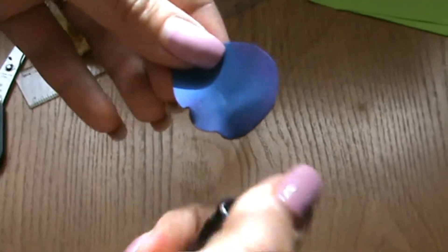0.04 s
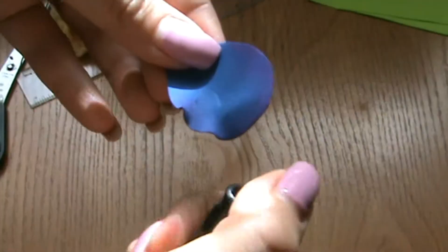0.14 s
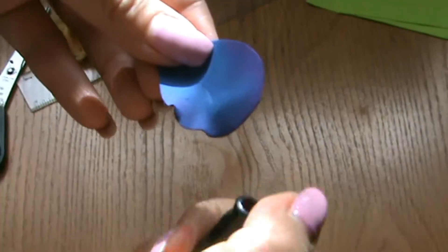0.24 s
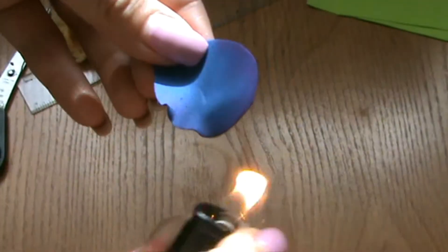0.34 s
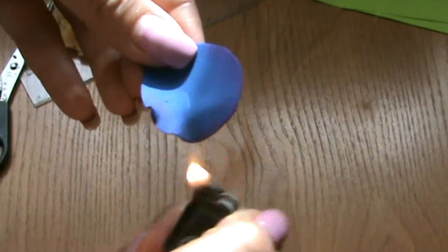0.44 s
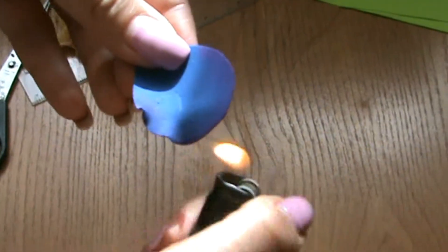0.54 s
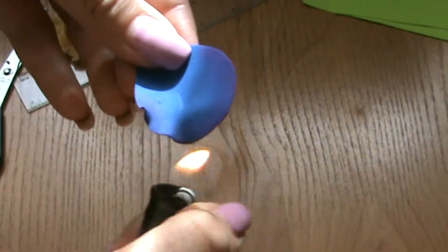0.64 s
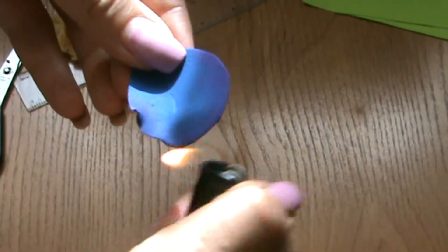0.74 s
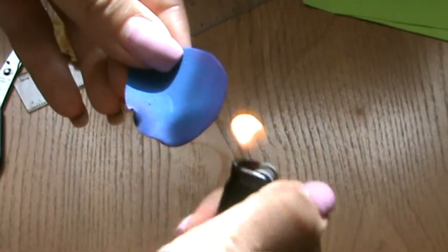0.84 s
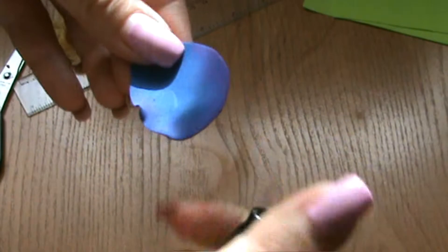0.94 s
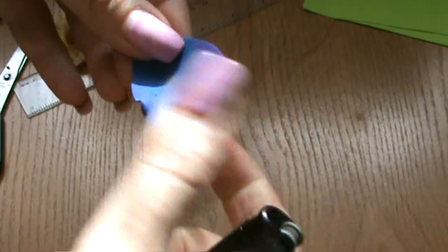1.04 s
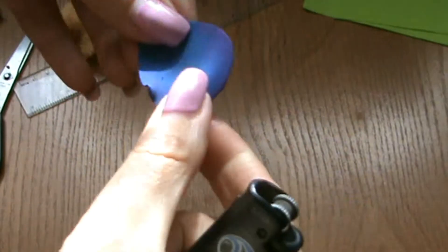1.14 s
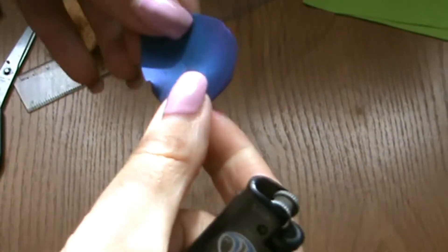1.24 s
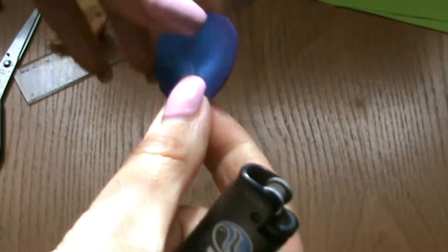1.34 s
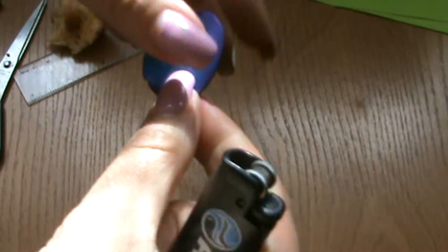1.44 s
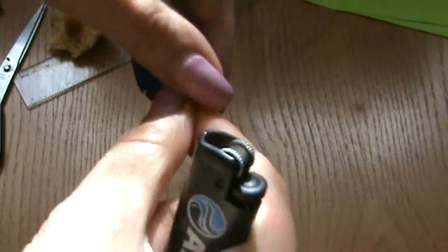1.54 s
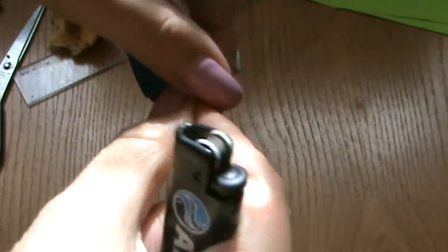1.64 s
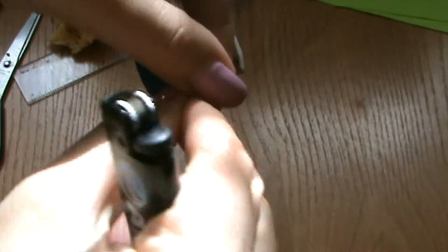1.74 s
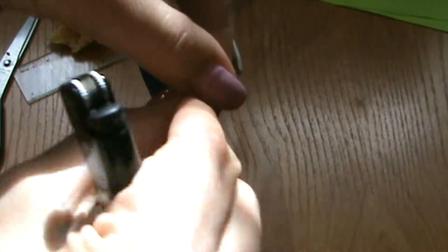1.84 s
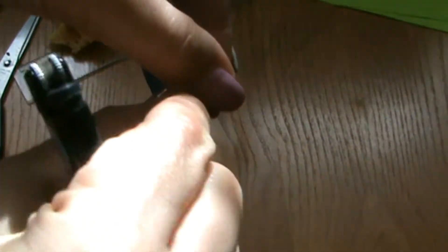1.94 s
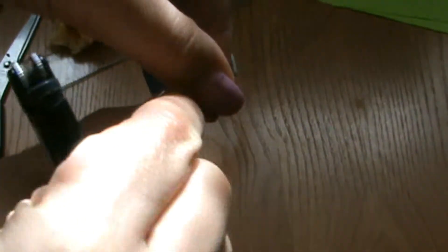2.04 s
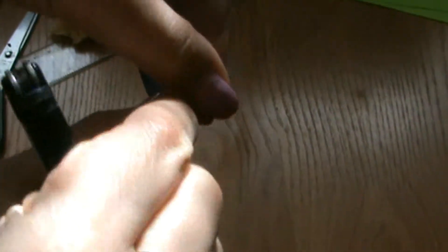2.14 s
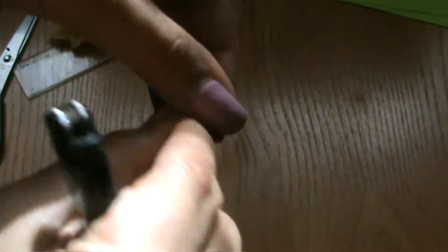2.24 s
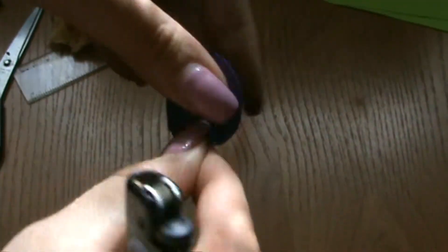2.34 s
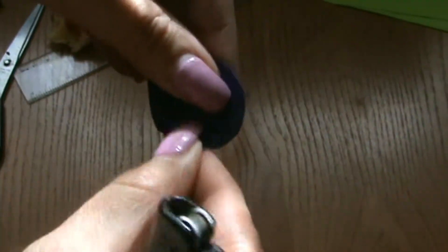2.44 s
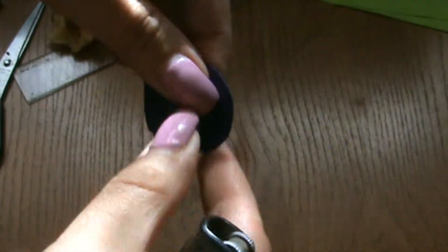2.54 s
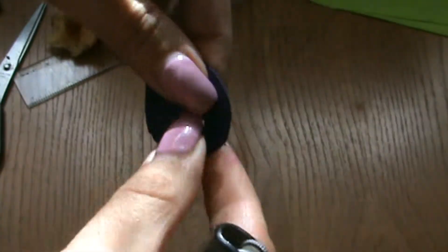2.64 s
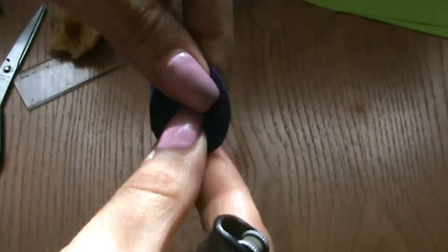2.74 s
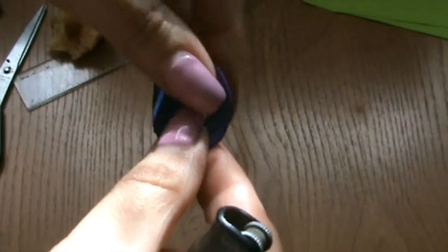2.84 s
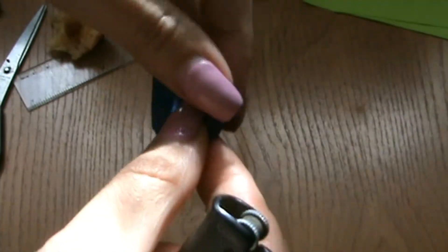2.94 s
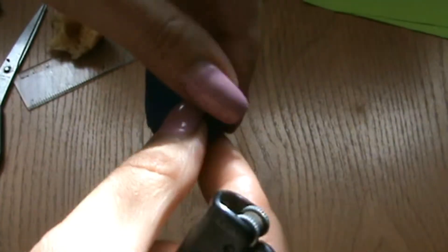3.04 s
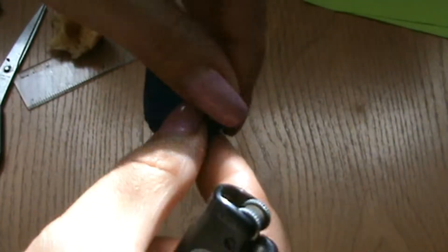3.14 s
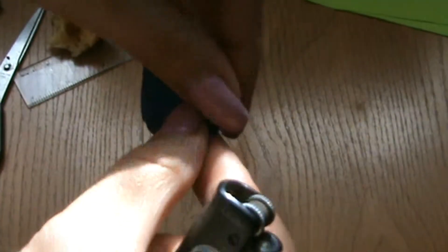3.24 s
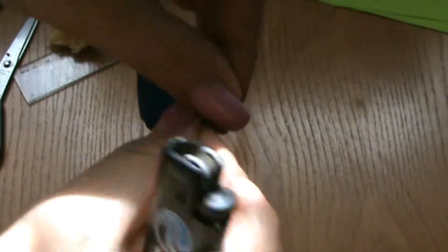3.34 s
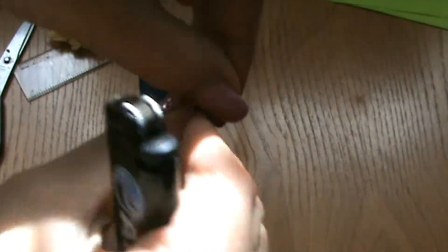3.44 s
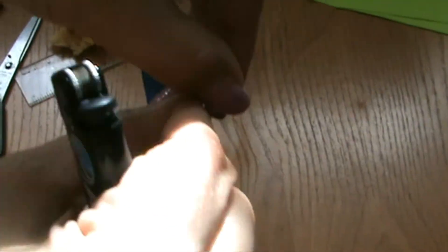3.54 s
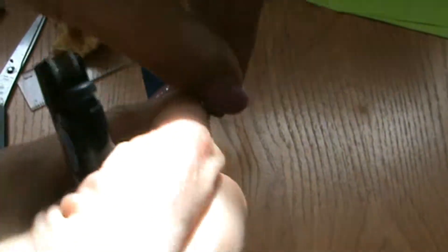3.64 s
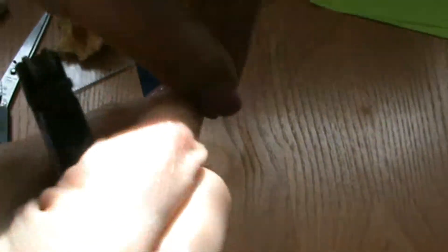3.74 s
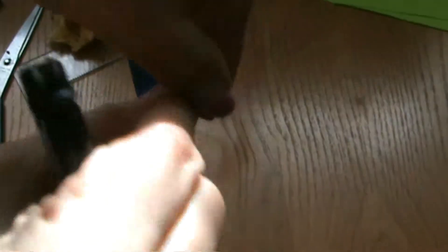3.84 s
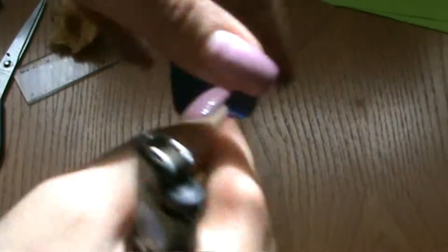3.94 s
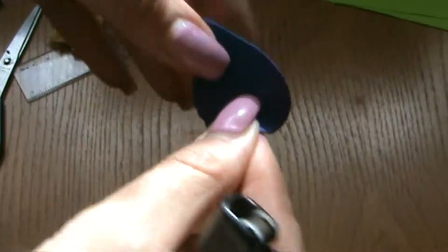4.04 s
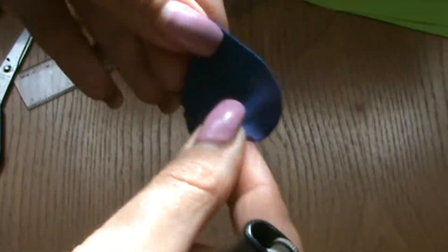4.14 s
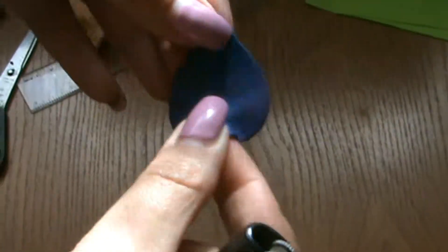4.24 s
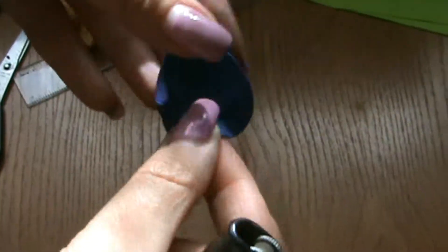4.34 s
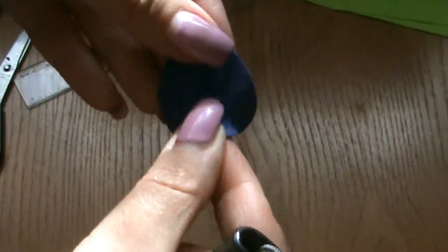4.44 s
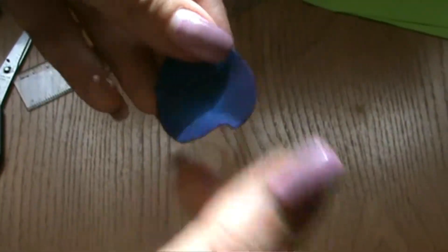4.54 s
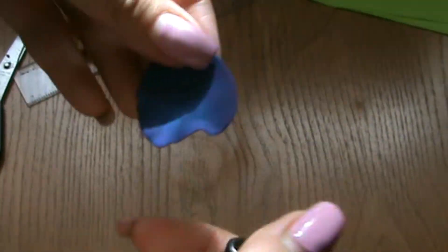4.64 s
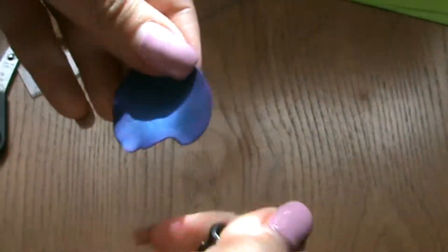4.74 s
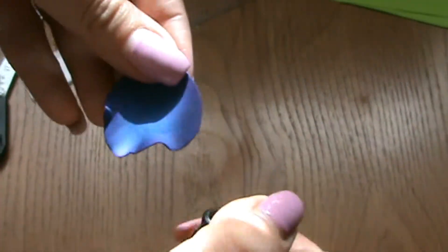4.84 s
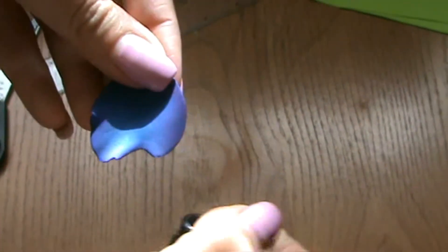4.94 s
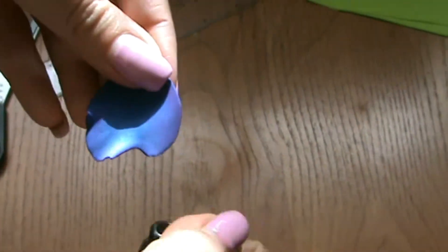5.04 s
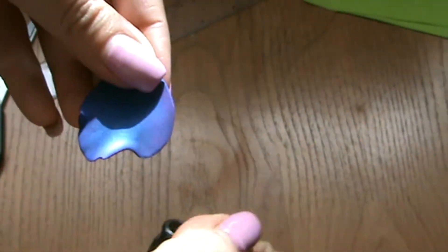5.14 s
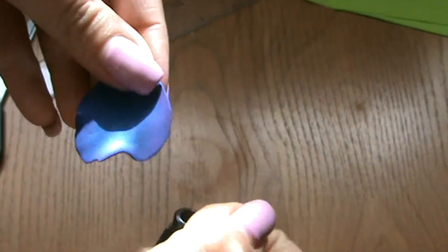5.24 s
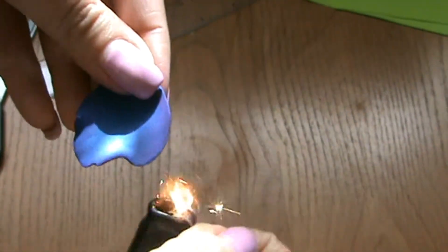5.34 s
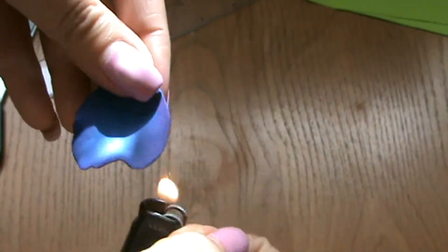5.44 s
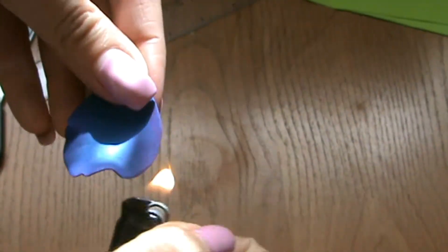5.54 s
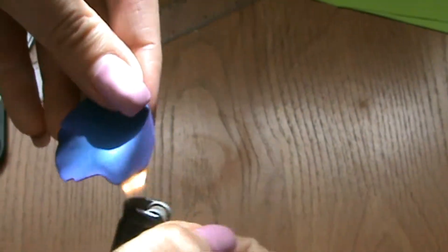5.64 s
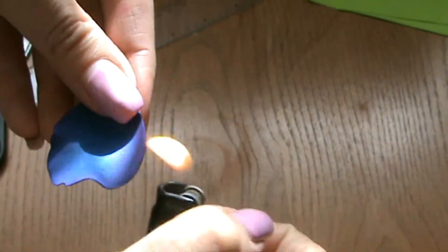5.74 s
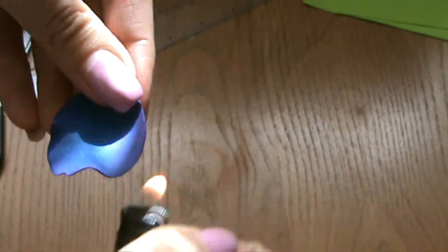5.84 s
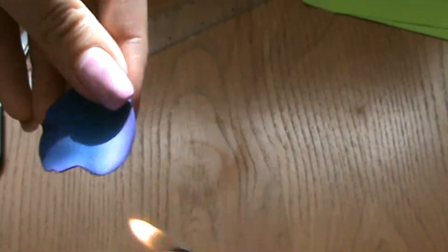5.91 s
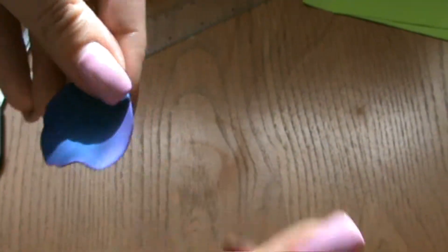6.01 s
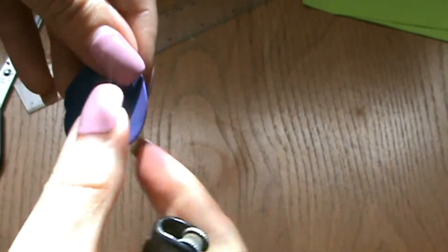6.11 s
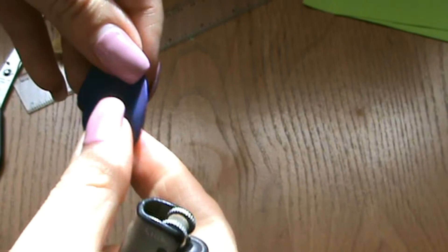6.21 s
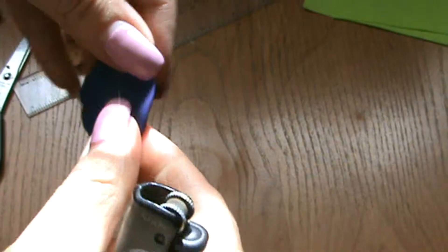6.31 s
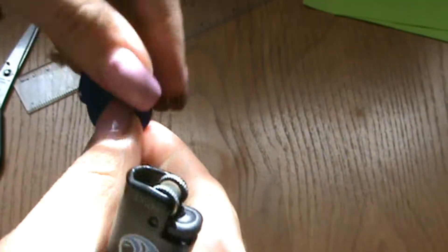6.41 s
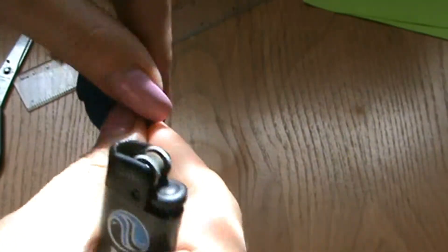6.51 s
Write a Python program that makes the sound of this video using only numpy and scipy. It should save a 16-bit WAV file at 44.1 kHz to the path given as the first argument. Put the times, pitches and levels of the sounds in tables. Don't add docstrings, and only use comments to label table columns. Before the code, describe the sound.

A pocket lighter near a camera over a wooden desk: the wheel grinds and cracks brightly, gas catches with a soft flutter and thin hiss, then the lever snaps back. Faint finger rubs and plastic ticks follow. Near the end a sharper strike lights it again, with another release click. Steady hiss, faint whine and irregular lens-motor ticks run underneath, in a small dry room.

```python
import sys
import numpy as np
from scipy import signal
from scipy.fft import rfft, irfft
from scipy.io import wavfile
from scipy.ndimage import map_coordinates

SR = 44100
rng = np.random.default_rng(int(sys.argv[2]) if len(sys.argv) > 2 else 0)


def inscribe(sig):
    pcm = np.round(np.clip(np.atleast_2d(sig).T, -1, 1) * 32767)
    wavfile.write(sys.argv[1], SR, pcm.astype(np.int16))


def convert_level_to_amplitude(level_db):
    exponent = np.asarray(level_db, float) / 20
    return 10 ** exponent


N = 289760


def rms_one(x):
    return x / np.sqrt(np.mean(x ** 2) + 1e-30)


def resonance(x, hz, width_hz):
    r = np.exp(-np.pi * width_hz / SR)
    zeros = np.array([1, 0, -1]) * (1 - r * r) / 2
    poles = [1, -2 * r * np.cos(2 * np.pi * hz / SR), r * r]
    return signal.lfilter(zeros, poles, x + 1e-18)


def mode_bank(x, modes):
    return sum(convert_level_to_amplitude(level_db) * (-1) ** k * resonance(x, hz, width_hz)
               for k, (hz, width_hz, level_db) in enumerate(modes))


def flicker(rate_hz):
    r = np.exp(-2 * np.pi * rate_hz / SR)
    drift = signal.lfilter([1], [1, -2 * r, r * r], rng.standard_normal(N + SR))
    return rms_one(drift[SR:])


def envelope(spans):
    t = np.arange(N) / SR
    return sum(convert_level_to_amplitude(np.interp(t, *np.transpose(rows), left=-200, right=-200)) for rows in spans)


def coloured(points):
    hz = np.maximum(np.fft.rfftfreq(N, 1 / SR), 1)
    point_hz, point_db = np.transpose(points)
    gain = convert_level_to_amplitude(np.interp(np.log(hz), np.log(point_hz), point_db, left=-90))
    return rms_one(irfft(rfft(rng.standard_normal(N)) * gain, N))


def camera():
    # f/Hz, density/dB per Hz
    hiss_mid = [(26, -32), (45, -3), (123, -2.5), (142, -6.5), (206, -1), (370, -3), (450, -1), (619, -6.5),
                (1230, -9), (1610, -6), (3190, -10), (3520, -9.5), (4960, -10.5), (12600, -11),
                (15700, -10)]
    hiss_side = [(26, -77), (45, -48), (83, -29), (120, -14), (509, -7), (1090, -7), (1570, -7),
                 (1730, -6.5), (14600, -28.5), (15700, -37)]
    # f/Hz, width/Hz, rms level/dB
    room_tones = [(151.7, 3.4, -80.5), (215, 17, -84.5), (460.6, 5, -82)]
    # t/s, level of its main hum/dB
    hum_load = [(0.6, -79.5), (1.56, -82.5), (1.94, -95), (2.35, -72.5), (2.51, -74.5), (2.76, -75.5),
                (3.24, -91), (3.56, -79), (3.98, -84), (4.16, -68.5), (4.43, -79), (4.83, -70.5),
                (5.02, -83), (5.2, -85)]
    # f/Hz, rms level/dB
    whines = [(12282, -76), (13286, -81.5)]
    # f/Hz, rms level/dB, phase/rad
    wobble = [(12.796, -59, 1.77), (38.398, -76, 1.3)]
    hum_sway_db, hum_hz, hum_width_hz = 1.2, 200, 10.5
    t = np.arange(N) / SR
    mid = convert_level_to_amplitude(-64) * coloured(hiss_mid)
    for hz, width_hz, level_db in room_tones:
        tone = rms_one(resonance(rng.standard_normal(N), hz, width_hz))
        mid += convert_level_to_amplitude(level_db + hum_sway_db * flicker(0.33)) * tone
    machine = rms_one(resonance(rng.standard_normal(N), hum_hz, hum_width_hz))
    mid += convert_level_to_amplitude(np.interp(t, *np.transpose(hum_load))) * machine
    for hz, level_db in whines:
        whine = np.sin(2 * np.pi * hz * t + 0.91 * flicker(4))
        mid += np.sqrt(2) * convert_level_to_amplitude(level_db + 1.4 * flicker(25)) * whine
    for hz, level_db, phase in wobble:
        mid += np.sqrt(2) * convert_level_to_amplitude(level_db) * np.cos(2 * np.pi * hz * t + phase)
    return mid + convert_level_to_amplitude(-61.5) * coloured(hiss_side) * [[1], [-1]]


def lens_motor(step_db, light_db, squeak_db, tap_db, tap_hz):
    # t/s, peak level/dB, f/Hz
    firm_steps = [(0.0396, -55.5, 1630), (0.6, -57.5, 1560), (0.76, -56, 1450), (0.8394, -58, 1480),
                  (0.9996, -56.5, 1530), (1.0795, -57.5, 1500), (1.239, -59, 1630), (1.44, -58.5, 1540),
                  (1.0595, -63, 1580), (1.3995, -65, 1900), (1.4795, -62, 1560), (1.62, -63, 1460),
                  (1.6995, -62, 1520), (1.7195, -61, 1420), (1.7795, -64, 1450), (1.8595, -63, 1700),
                  (1.9795, -65, 1400), (2.1195, -64, 1450), (2.1595, -63, 1420), (2.5595, -63, 1500),
                  (2.6395, -63, 1600), (1.9995, -64, 1410), (2.3195, -67, 1420), (2.4795, -71, 1410),
                  (3.0004, -59, 1610), (3.6593, -63, 1410), (3.7814, -55.5, 1640), (4.0406, -55, 1450),
                  (4.1587, -66, 1430), (4.4798, -57.5, 1560), (5.16, -55.5, 1480), (5.24, -56, 1455),
                  (5.32, -54.5, 1580), (5.5593, -57.5, 1450), (5.6395, -55, 1520), (5.719, -58, 1480),
                  (5.7997, -57.5, 1470), (6.039, -56, 1460), (6.1194, -59.5, 1440), (6.3593, -63, 1790),
                  (6.481, -58, 1500)]
    # t/s, peak level/dB, f/Hz
    hunts = [(0.1595, -66, 1570), (0.2395, -66, 1580), (0.2795, -63, 1630), (0.3, -62, 1420),
             (0.4395, -64.2, 1580), (0.4795, -66, 1360), (0.64, -63, 1370), (0.8795, -64, 1360),
             (1.1595, -67, 1620), (1.3595, -67, 1580), (1.5195, -65, 1780), (1.5595, -63, 1580),
             (1.5995, -70, 1580), (1.6195, -63, 1410), (1.679, -65, 1750), (1.7986, -62, 1450),
             (1.84, -63.5, 1580), (1.9995, -73, 1430), (2.0395, -66, 1380), (2.0795, -63, 1440),
             (2.1395, -67, 1410), (2.279, -65, 1770), (2.3595, -69, 1450), (2.3995, -68, 1600),
             (2.4795, -68, 1380), (2.519, -66, 1600), (2.6195, -62.5, 1450), (2.6785, -64, 1770),
             (2.959, -66, 1390), (3.079, -62, 1620), (3.3195, -67, 1400), (3.3995, -71, 1420),
             (3.4395, -67, 1380), (3.6395, -67, 1430), (3.7205, -63, 1380), (3.7395, -70, 1590),
             (3.8795, -67, 1390), (4.1192, -67.6, 1770), (4.1595, -71, 1440), (4.4195, -63, 1425),
             (4.6395, -68, 1580), (4.6795, -64, 1445), (4.879, -63, 1580), (5.04, -68, 1586),
             (5.0595, -69, 1590), (5.1195, -75, 1570), (5.3395, -64, 1600), (5.4195, -75, 1420),
             (5.4392, -62, 1820), (5.4603, -63, 1640), (5.6995, -67, 1430), (5.7795, -67.5, 1430),
             (5.9195, -65.6, 1570), (5.9395, -64.9, 1600), (5.9595, -68, 1410), (6.0995, -65, 1450),
             (6.1995, -65, 1600), (6.2795, -67.2, 1580), (6.3595, -65, 1480), (6.4413, -65, 1550)]
    # t/s, peak level/dB
    binds = [(0.1995, -65), (1.0795, -65), (1.1395, -73.2), (1.1995, -65), (1.6195, -68), (1.6395, -73.9),
             (1.6795, -74), (1.6995, -63), (1.7595, -65), (1.7795, -66), (1.7995, -64), (1.8595, -68),
             (1.9195, -68), (1.9795, -68), (2.1995, -67), (2.3195, -63), (2.3595, -66), (2.4795, -72.2),
             (2.5795, -71), (2.6395, -70), (2.7995, -73.6), (2.9195, -66), (3.0395, -73), (3.1995, -71.9),
             (3.2795, -72.4), (3.3595, -75), (3.4795, -69), (3.6395, -63), (3.7195, -71), (3.7595, -66),
             (3.7995, -67), (3.8395, -68), (3.9195, -66), (4.0795, -79), (4.3595, -68), (4.4195, -72.4),
             (4.4395, -65), (4.4595, -73.6), (4.4995, -73.6), (4.7995, -73.4), (5.1595, -71), (5.3195, -67),
             (6.1195, -70), (6.1595, -77), (6.3195, -80)]
    housing_hz, housing_spread_hz = np.array([1410, 1580, 1410, 1790]), 30
    clock_s, idle_db = .02, -71.5
    firm_t60_s, firm_rise_s, tap_t60_s = 0.033, .0004, .007
    light_t60_s, light_rise_s = .048, .0012
    squeak_hz, squeak_t60_s = 3570, 0.053

    beats = np.arange(clock_s, N / SR - .1, clock_s) - .0005
    pitch_jolt, level_jolt = rng.standard_normal((2, len(beats)))
    pitch = rng.choice(housing_hz, len(beats)) + housing_spread_hz * pitch_jolt
    idle = np.transpose([beats, idle_db + 3 * level_jolt, pitch])

    rows = [(s, db + step_db, hz, firm_t60_s, firm_rise_s) for s, db, hz in firm_steps]
    rows += [(s, db, hz, light_t60_s, light_rise_s) for s, db, hz in idle]
    rows += [(s, db + 3 + 3 * j, f, tap_t60_s, firm_rise_s)
             for (s, db, _), j in zip(idle, pitch_jolt) for f in tap_hz]
    rows += [(s, db + step_db + tap_db, f, tap_t60_s, firm_rise_s)
             for s, db, _ in list(firm_steps) + list(hunts[::2]) for f in tap_hz]
    rows += [(s, db + light_db, hz, light_t60_s, light_rise_s) for s, db, hz in hunts]
    rows += [(s, db + squeak_db, squeak_hz + 25 * j, squeak_t60_s, light_rise_s)
             for (s, db), j in zip(binds, pitch_jolt)]

    out, t = np.zeros(N), np.arange(SR // 16) / SR
    for s, peak_db, hz, t60, rise in rows:
        at = round(s * SR)
        ring = np.sin(2 * np.pi * hz * t) * (1 - np.exp(-t / rise))
        out[at:at + len(t)] += convert_level_to_amplitude(peak_db - 60 * t / t60) * ring
    return out


def swells(table, octaves, rise_share):
    return [(s, level_db, hz, octaves, rise_share * ms, (1 - rise_share) * ms)
            for s, level_db, hz, ms in table]


def wheel_strokes():
    # t of top/s, rms level/dB, centre f/Hz, length/ms
    rasps = [
        (0.232, -66, 4260, 24),
        (0.262, -57, 4300, 40),
        (0.285, -55, 4450, 32),
        (0.318, -39, 4350, 21),
        (5.36, -54, 3500, 30),
        (5.358, -42.5, 7530, 29),
    ]
    # t/s, rms level at top/dB, centre f/Hz, width/octaves
    bites = [(0.301, -50, 6500, 1.4), (0.309, -41.5, 5200, 2.6), (0.315, -36, 5200, 0.69),
             (0.322, -30, 5700, 1.6), (0.326, -23, 6360, 1.08), (0.333, -26, 6730, 1.5),
             (0.3429, -29, 5000, 1.8), (0.353, -36.5, 6000, 1.23), (0.327, -39, 14000, 0.37),
             (0.336, -38, 14200, 0.23), (5.383, -40, 13900, 0.46), (5.393, -39, 13500, 0.37),
             (5.348, -44, 7100, 0.74), (5.356, -46, 7700, 0.55), (5.363, -40, 7360, 0.64),
             (5.371, -36, 6470, 0.8), (5.375, -33.5, 4550, 2.8), (5.38, -29, 7260, 0.9),
             (5.385, -25, 7260, 0.78), (5.392, -27, 7400, 0.78), (5.392, -30.5, 5600, 2.1),
             (5.399, -32.5, 5700, 1.06), (5.41, -48, 5700, 1)]
    rise_ms, fall_ms = 4.8, 4.9
    return swells(rasps, .2, 0.47) + [(*row, rise_ms, fall_ms) for row in bites]


def lever_strokes():
    # t/s, rms level at top/dB, centre f/Hz, width/octaves
    ticks = [(0.232, -55, 4200, 0.3), (0.2595, -42, 7000, 1.5), (0.265, -51, 6800, 1.5),
             (0.3, -50, 9500, 0.5), (5.319, -57, 5500, 1.8), (0.3325, -37, 7200, 2),
             (0.4015, -45, 2500, 4.4), (0.415, -45.5, 6400, 1.7), (0.9503, -37, 5900, 1.44),
             (2.302, -43, 5600, 2.3), (2.418, -52.5, 5700, 2.3), (3.9615, -52, 5700, 2.2),
             (4.0928, -54, 4600, 1.4), (4.189, -56, 5760, 1.5), (4.215, -56, 3500, 3),
             (4.931, -40.5, 5150, 1.27), (4.931, -62, 1810, 1.1), (0.952, -60, 2000, 1.4),
             (5.895, -54.5, 2770, 1.24), (6.032, -55.5, 3920, 0.72)]
    snaps = [(0.9407, -51, 4600, 0.6), (0.9463, -35, 6700, 1.14), (0.9533, -51, 4900, 1.3),
             (5.3887, -14.5, 7400, 0.95), (5.9722, -42.5, 5960, 0.42), (5.978, -33.5, 7450, 0.71),
             (5.981, -35, 7400, 0.76), (5.9851, -37.5, 6500, 3.2), (5.9875, -43, 6700, 0.98),
             (3.96, -37, 4900, 2.95), (5.3725, -33, 6000, 1.6), (5.3915, -27, 7500, 1.2),
             (5.356, -37, 7000, 0.6), (0.3255, -25.5, 6300, 1.2), (5.895, -52, 2700, 1.7),
             (3.8, -56, 5500, 1.6), (4.5, -55, 3600, 2.0), (4.228, -55, 6000, 1.4), (4.004, -57, 5500, 1.3),
             (4.1015, -46, 5900, 0.7), (4.117, -54, 6200, 1.0), (2.542, -42, 4100, 1.5),
             (2.4975, -43, 6700, 1.9), (2.534, -44, 5700, 0.76), (2.538, -45, 6000, 2.2),
             (4.3096, -35.5, 6800, 0.83), (4.3128, -49, 7200, 1.14), (0.3242, -24, 6800, 0.98),
             (0.334, -30, 6600, 0.71), (0.342, -31, 6900, 1.34), (5.3974, -27, 5800, 1.3),
             (5.4, -28.5, 5300, 2), (5.411, -37, 4000, 2.8), (6.372, -48, 4400, 2.1)]
    tick_rise_ms, tick_fall_ms = 0.26, 2.5
    snap_rise_ms, snap_fall_ms = 0.3, 1
    rows = [(*row, tick_rise_ms, tick_fall_ms) for row in ticks]
    return rows + [(*row, snap_rise_ms, snap_fall_ms) for row in snaps]


def finger_strokes():
    # t of top/s, rms level/dB, centre f/Hz, length/ms
    drags = [(0.243, -55, 7000, 17), (0.285, -50, 6100, 55), (0.368, -47.5, 5360, 31),
             (0.96, -58, 5370, 31), (1.552, -58, 5700, 18), (3.94, -60.5, 6100, 28), (3.966, -61, 5500, 17),
             (4.103, -58.5, 6100, 44), (4.32, -62, 6000, 21), (4.942, -58.5, 5000, 16),
             (5.334, -53, 7900, 14), (5.419, -44.5, 6840, 12), (5.44, -57, 5600, 44),
             (6.373, -61, 4810, 30)]
    rubs = [(1.305, -62.5, 7400, 37), (1.538, -60.5, 5900, 9), (2.43, -56, 7300, 20),
            (2.442, -52.5, 5600, 9.5), (2.498, -49.5, 6400, 15), (2.526, -51, 6100, 24),
            (2.537, -46.5, 5270, 7.1), (2.59, -61, 8000, 8), (3.085, -65.5, 4350, 13),
            (3.915, -65, 4900, 49), (4.165, -65, 6150, 16), (4.243, -60.5, 6740, 36), (4.31, -44, 6200, 17),
            (4.428, -62, 5900, 10), (4.521, -46.5, 6330, 15.3), (5.022, -60.5, 5000, 6.5),
            (5.36, -53.5, 3400, 34), (4.108, -61, 6300, 11), (4.235, -64, 7000, 8),
            (6.015, -58.5, 5600, 46), (6.23, -62.5, 7060, 14)]
    return swells(drags, 1.32, 0.19) + swells(rubs, 0.98, 0.54)


def body_strokes():
    # t of top/s, rms level/dB, centre f/Hz, length/ms
    rings = [(0.245, -54, 4180, 10), (0.284, -59, 8330, 6.3), (0.299, -32.5, 4600, 3.3),
             (0.314, -41, 4300, 12), (0.327, -25.5, 6100, 7.1), (0.334, -29, 9300, 5),
             (0.9466, -39.5, 8600, 2), (2.535, -51, 3720, 5.2), (3.937, -61, 6460, 8),
             (3.951, -66, 9700, 14), (3.9603, -49, 10000, 3.4), (4.165, -63, 5900, 4),
             (4.24, -68, 5470, 20), (4.33, -65, 5600, 14), (5.352, -35, 7590, 7), (5.369, -31, 5630, 9.3),
             (5.385, -42, 6470, 7.1), (5.398, -38, 5350, 7.1), (5.409, -51, 9800, 8),
             (5.418, -50, 7430, 10), (5.424, -56, 5500, 14)]
    # t/s, rms level at top/dB, centre f/Hz, length/ms
    rattles = [(0.3254, -38, 1180, 3.4), (0.333, -49, 740, 8.3), (0.334, -34, 2500, 4.5),
               (0.342, -46, 980, 11.5), (0.4145, -47.5, 1150, 1.9), (0.959, -56.5, 890, 2.7),
               (2.303, -57, 990, 3.4), (2.44, -60.5, 910, 13), (2.499, -58.5, 990, 12),
               (2.538, -51.5, 1000, 4.6), (4.12, -67.5, 800, 12), (4.095, -68, 2800, 6),
               (4.1165, -60, 2500, 2), (4.203, -61, 2300, 7.2), (4.234, -57.5, 675, 16),
               (4.305, -56.5, 2500, 26), (5.387, -44.5, 503, 4.5), (0.329, -45, 746, 5.7),
               (5.391, -47, 1040, 5.7), (3.961, -57, 690, 4), (2.304, -57.5, 2000, 5.2),
               (4.52, -64.5, 816, 16), (4.52, -58.5, 2500, 8.2), (2.442, -56, 2500, 8),
               (4.105, -61.5, 3000, 14), (4.235, -62.5, 2500, 23), (0.346, -47, 750, 7.4),
               (5.3742, -47, 1790, 2.1), (5.389, -41, 2500, 5.2), (5.399, -42.5, 1100, 11),
               (6.001, -53, 666, 7.7)]
    return swells(rings, 0.08, 0.31) + swells(rattles, 1.86, 0.4)


def contacts(grains_per_s, grain_db, smooth, ring_db, skirt_db, snap):
    # f/Hz, width/Hz, level/dB
    hood = [(4510, 200, 4.5), (4600, 470, 2.5), (5600, 100, 1), (6100, 180, 15.5), (6380, 210, -2),
            (7450, 230, -14), (8230, 280, -33), (9360, 480, 16.5), (9750, 310, 3)]
    grit = convert_level_to_amplitude(grain_db * np.minimum(rng.exponential(1, N), 2.6)) * rng.choice([-1, 1], N)
    grit = rms_one(grit * (rng.random(N) < grains_per_s / SR)) + smooth * rng.standard_normal(N)
    out = np.zeros(N)
    strokes = wheel_strokes() + lever_strokes() + finger_strokes() + body_strokes()
    for s, level_db, hz, octaves, rise_ms, fall_ms in strokes:
        rise, fall = rise_ms * SR / 1000, fall_ms * SR / 1000
        n = np.arange(-int(3 * rise), int(7 * fall))
        stroke = np.where(n < 0, np.exp(-(n / rise) ** 2), np.exp(-np.maximum(n, 0) / fall))
        at = round(s * SR) + n
        swarm = grit[at] + (n == 0) * snap / max(rise_ms, .3)
        stroke_rms = np.sqrt(np.sum((swarm * stroke) ** 2) / np.sum(stroke ** 2))
        raw = swarm / stroke_rms * stroke
        edges = np.clip(hz * 2 ** (np.array([-.5, .5]) * octaves), 300, 16000)
        width_hz = edges[1] - edges[0]
        at -= round(.6 * SR / width_hz)
        band = signal.sosfilt(signal.butter(3, edges, "band", fs=SR, output="sos"), raw)
        out[at] += convert_level_to_amplitude(level_db) * (band * np.sqrt(SR / 2 / width_hz) + convert_level_to_amplitude(skirt_db) * raw)
    return out + convert_level_to_amplitude(ring_db) * mode_bank(out, hood)


def desk(x, t60, dull):
    t = np.arange(SR // 4) / SR
    tails = signal.lfilter([1 - dull], [1, -dull], rng.standard_normal((2, len(t))))
    tails *= convert_level_to_amplitude(-60 * t / t60) * (t > .002)
    tails /= np.sqrt(np.sum(tails ** 2, axis=1, keepdims=True))
    return signal.fftconvolve(x[None], tails, axes=1)[:, :N]


def knocks(softness):
    # t/s, peak level/dB, f/Hz, t60/s, push +1 or pull -1
    pushes = [(0.325, -24.5, 440, 0.0047, 1), (0.3401, -31.5, 330, 0.02, -1),
              (0.3444, -33.5, 200, 0.074, -1), (0.3536, -29, 174, 0.015, -1),
              (0.954, -55.5, 165, 0.037, -1), (2.535, -50, 130, 0.017, -1), (3.9605, -49, 610, 0.013, 1),
              (3.9602, -52, 880, 0.02, 1), (3.9602, -53, 1600, 0.015, 1), (0.3265, -40, 760, 0.02, 1),
              (4.215, -48, 500, 0.0077, -1), (4.31, -55, 90, 0.02, -1), (5.3734, -33, 250, 0.011, 1),
              (5.3949, -35, 217, 0.044, -1), (5.4008, -31, 252, 0.0044, -1), (5.4089, -35.5, 296, 0.011, 1),
              (5.996, -44.5, 218, 0.013, -1), (6.0004, -41.5, 109, 0.023, -1),
              (6.004, -43.5, 200, 0.015, 1), (6.371, -55.5, 404, 0.032, -1)]
    out, t = np.zeros(N), np.arange(SR // 8) / SR
    for s, peak_db, hz, t60, push in pushes:
        pulse = np.sin(2 * np.pi * hz * t) * convert_level_to_amplitude(-60 * t / t60) * (1 - np.exp(-t * hz / softness))
        at = round(s * SR)
        out[at:at + len(t)] += push * convert_level_to_amplitude(peak_db) * pulse / np.max(np.abs(pulse))
    return out


def flame():
    # opens t/s, shuts t/s, jet rms level/dB, puff rms level/dB, puff hold/s
    burns = [
        (0.386, 0.944, -63.5, -47.5, 0.027),
        (5.439, 5.982, -64.5, -56, 0.034),
    ]
    # f/Hz, width/Hz, level/dB
    nozzle = [(2020, 80, -2), (2250, 95, 1.5), (2684, 120, 4.5), (2900, 115, 4), (3060, 185, 4.5),
              (3550, 100, -1.5), (4000, 220, -4.5), (5310, 180, -7)]
    jet_climb_per_s = 0.09
    jet_rush_db, jet_rush_s, jet_dies_s = 0, .27, 0.025
    puff_lead_s, puff_sag_db_per_s, puff_fall_db_per_s = 0.021, 70, 500
    flutter_hz, flutter_top_s, flutter_db = 31.2, 0.011, 5.5

    t = np.arange(N) / SR
    middle = np.array([(opens + shuts) / 2 for opens, shuts, *_ in burns])
    nearest = np.argmin(np.abs(t[:, None] - middle), axis=1)
    opened = np.array([row[0] for row in burns])[nearest]
    since = t - middle[nearest]

    puff = resonance(resonance(rng.standard_normal(N), 206, 36), 220, 77)
    throb = np.cos(2 * np.pi * flutter_hz * (t - opened - flutter_top_s))
    throb = convert_level_to_amplitude(flutter_db * throb + 1.8 * flicker(76))

    jet = mode_bank(rng.standard_normal(N) * convert_level_to_amplitude(1.04 * flicker(37)), nozzle)
    read_s = t + jet_climb_per_s * since ** 2 / 2
    jet = map_coordinates(jet, [read_s * SR], order=3)

    flow, catch = [], []
    for opens, shuts, jet_db, puff_db, hold in burns:
        flow.append([(opens, jet_db + jet_rush_db), (opens + jet_rush_s, jet_db),
                     (shuts, jet_db + jet_rush_db), (shuts + jet_dies_s, jet_db - 6)])
        sagged_db = puff_db - puff_sag_db_per_s * hold
        catch.append([(opens - puff_lead_s, puff_db), (opens + hold, sagged_db),
                      (opens + hold + 0.12, sagged_db - 0.093 * puff_fall_db_per_s)])
    return rms_one(puff) * throb * envelope(catch) + rms_one(jet) * envelope(flow)


def scene():
    motor = lens_motor(step_db=0.5, light_db=4.0, squeak_db=3.5, tap_db=0.5,
                       tap_hz=(1410, 1990, 2500, 3010, 3600))
    bright = contacts(grains_per_s=8000, grain_db=4.5, smooth=.55, ring_db=-9.5, skirt_db=-63.0, snap=2.2)
    apart = resonance(bright, 13270, 5100)
    bright = bright - 0.9 * apart
    hands = bright + knocks(softness=0.32) + flame()
    quarter_turn = signal.hilbert(resonance(apart, 17700, 4600)).imag
    opposed = convert_level_to_amplitude(-2.5) * quarter_turn * [[-1], [1]]
    room = convert_level_to_amplitude(-10.5) * desk(bright, 0.095, dull=0.67)
    return hands + opposed + room + motor * np.array([[1.5], [.6]]) + camera()


def band_limit(x):
    return signal.sosfilt(signal.butter(12, 16500, fs=SR, output="sos"), x)


def record(dry):
    cutoff_hz = 15950
    lowpass = signal.cheby2(12, 40, cutoff_hz + 250, fs=SR, output="sos")
    return band_limit(signal.sosfilt(lowpass, dry))


dry = scene()
out = record(dry)
inscribe(out)
```